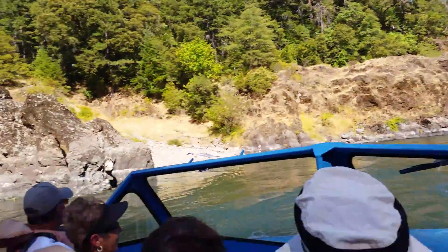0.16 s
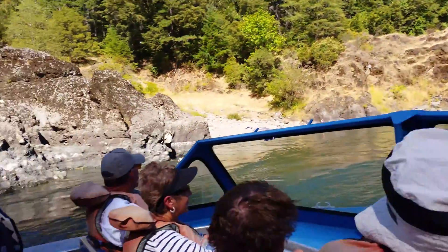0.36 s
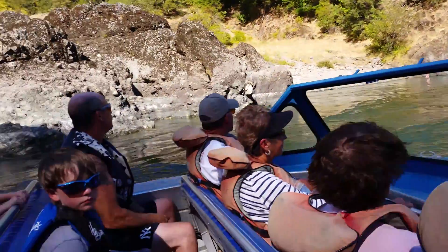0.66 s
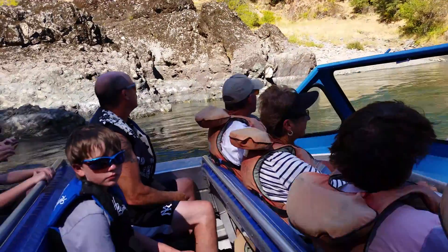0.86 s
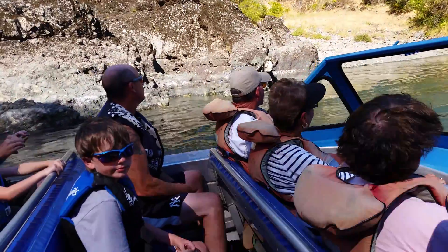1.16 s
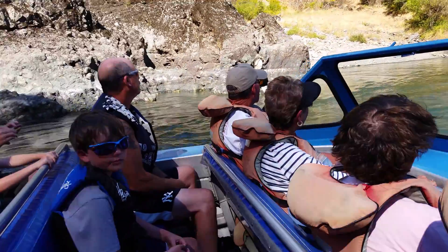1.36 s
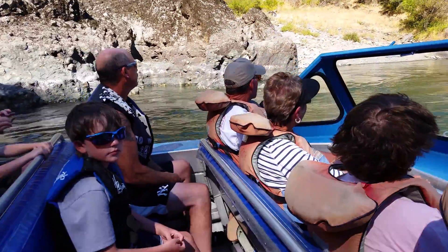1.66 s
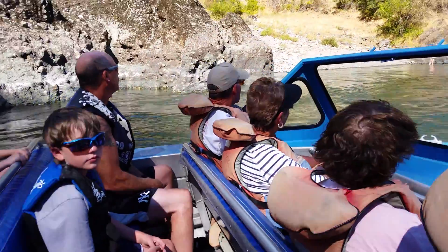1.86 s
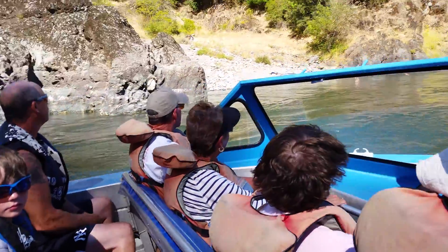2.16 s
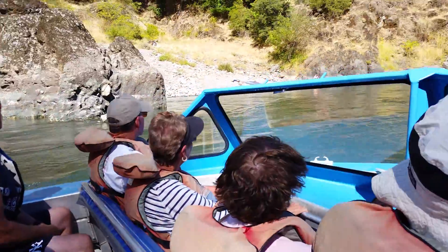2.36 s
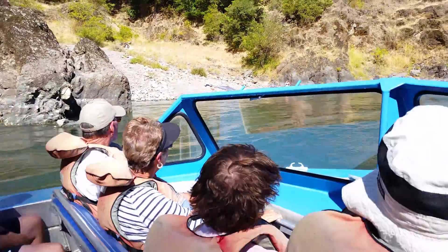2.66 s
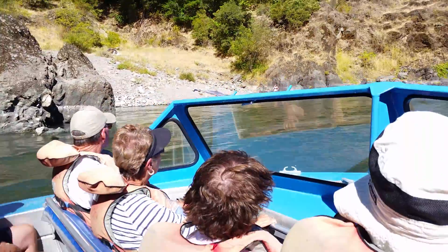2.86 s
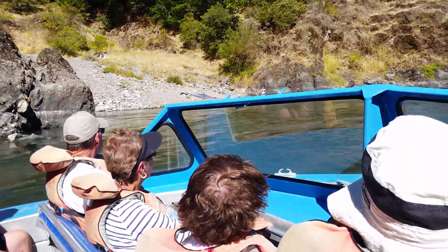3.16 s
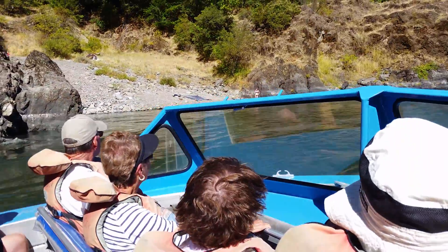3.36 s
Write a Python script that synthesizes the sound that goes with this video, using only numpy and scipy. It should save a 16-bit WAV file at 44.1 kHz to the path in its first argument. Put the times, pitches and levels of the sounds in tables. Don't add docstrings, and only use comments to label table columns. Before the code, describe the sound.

Several motorboat engines behind the passengers hum at slightly different speeds, pulsing together and rising slightly in pitch, while churning water rushes and spray hisses around; close, open-air stereo from a small camera aboard.

```python
import sys
import numpy as np
from scipy import signal
from scipy.fft import rfft, irfft
from scipy.io import wavfile
from scipy.ndimage import uniform_filter1d

SR = 44100
rng = np.random.default_rng(int(sys.argv[2]) if len(sys.argv) > 2 else 0)


def natural_amplitude(level_db):
    exponent = np.asarray(level_db, float) / 20
    return 10 ** exponent


def materialize(psi):
    bounded = np.clip(np.atleast_2d(psi).T, -1, 1)
    quanta = np.round(bounded * 32767).astype(np.int16)
    wavfile.write(sys.argv[1], SR, quanta)


N = 154350

# [t/s, jet wash level/dB, spray level/dB]
WASH_LEVELS = [(0.0, -44, -50.5), (0.12, -44.5, -54), (0.37, -44.5, -53), (0.69, -45, -56.5),
               (0.74, -44.5, -54), (1.64, -47, -53.5), (2.01, -48, -57), (2.37, -47.5, -56),
               (2.61, -48.5, -59.5), (3.45, -47.5, -60)]

WANDER_PER_S = 1.5


def in_time(rows):
    s, *columns = np.transpose(rows)
    return [np.interp(np.arange(N) / SR, s, c) for c in columns]


def at_hz(points, hz):
    p = np.array(points)
    return np.interp(np.log(hz + 1), np.log(p[:, 0]), p[:, 1])


def rms_one(x):
    return x / np.sqrt(np.mean(x ** 2) + 1e-20)


def colour(x, points):
    hz = np.fft.rfftfreq(len(x), 1 / SR)
    return irfft(rfft(x) * natural_amplitude(at_hz(points, hz)), len(x))


def drift(rate):
    r = np.exp(-200 * np.pi * rate / SR)
    slow = signal.lfilter([1], [1, -2 * r, r * r], rng.standard_normal(N // 100 + 1002))
    slow = slow[1000:]
    return np.interp(np.arange(N) / 100, np.arange(len(slow)), rms_one(slow - slow.mean()))


def openness_db():
    # [t/s, level/dB]
    flooding = [(0.0, -24.5), (0.02, -21), (0.24, -26.5), (0.42, -19), (0.5, -27.5), (0.91, -21),
                (1.04, -25.5), (1.07, -22), (1.47, -26), (1.5, -22.5), (2.49, -23.5), (2.88, -27.5),
                (3.18, -20.5), (3.5, -22)]
    db, = in_time(flooding)
    return db - db.mean()


def puffs(turns):
    # [f/Hz, width/Hz, level/dB]
    exhaust = [(86, 51.3, -3.5), (181, 64.7, -0.5), (211, 42.5, -1), (317, 86, -7.5), (406, 148, -14)]
    level_db, spread_db, jitter_s = -33.5, 5.0, .0012
    firings = np.flatnonzero(np.diff(np.floor(turns)))
    luck = rng.standard_normal((len(firings), 2))
    places = np.clip(firings + (jitter_s * SR * luck[:, 0]).astype(int), 0, N - 1)
    clicks = np.full(N, 1e-18)
    clicks[places] = natural_amplitude(spread_db * luck[:, 1]) - 1

    out = 0
    for k, (hz, width, db) in enumerate(exhaust):
        r = np.exp(-np.pi * width / SR)
        ringing = [1, -2 * r * np.cos(2 * np.pi * hz / SR), r * r]
        sign = (-1) ** k
        out = out + sign * natural_amplitude(db) * signal.lfilter([1 - r, 0, r - 1], ringing, clicks)
    return natural_amplitude(level_db) * rms_one(out)


def engine(rows, orders, start, firing_db, pan_db, lag):
    # [f/Hz, level/dB]
    hull = [(200, -1), (222, 1), (240, -5), (265, -2)]
    cylinders = 8
    firing_wander_db, wander_db, slip_turns = .5, 3.0, .04
    hz, db = in_time(rows)
    open_db = openness_db()
    turns = start + np.cumsum(hz) / SR
    firing_level = natural_amplitude(db + firing_db + firing_wander_db * drift(WANDER_PER_S))
    out = firing_level * np.cos(2 * np.pi * turns)

    for multiple, level_db in orders:
        share = multiple / cylinders
        phase = share * turns + rng.random() + slip_turns * drift(WANDER_PER_S)
        tone_db = level_db + at_hz(hull, share * hz) + wander_db * drift(WANDER_PER_S)
        if share > 1:
            tone_db = tone_db + open_db
        out += natural_amplitude(tone_db) * np.cos(2 * np.pi * phase)

    out = np.sqrt(2) * out + natural_amplitude(open_db) * puffs(turns)
    late = np.interp(np.arange(N) - lag * SR, np.arange(N), out)
    return np.array([out * natural_amplitude(pan_db / 2), late * natural_amplitude(-pan_db / 2)])


def three_engines():
    # [t/s, firing rate f/Hz, firing tone level/dB]
    speed_a = [(0.0, 125.6, -17), (0.292, 125.96, -17), (0.583, 126.76, -15), (0.875, 127.14, -18),
               (1.167, 129.64, -14), (1.458, 132.1, -13), (1.75, 133.99, -20), (2.042, 132.57, -20),
               (2.333, 133.0, -18), (2.625, 133.29, -13), (2.917, 133.41, -13), (3.208, 133.98, -19),
               (3.5, 134.08, -20)]
    speed_b = [(0.0, 121.34, -18), (0.292, 121.07, -21), (0.583, 120.79, -21), (0.875, 120.42, -22),
               (1.167, 122.67, -36), (1.458, 125.78, -20), (1.75, 127.85, -19), (2.042, 128.84, -17),
               (2.333, 130.02, -19), (2.625, 130.87, -21), (2.917, 131.97, -19), (3.208, 134.48, -21),
               (3.5, 136.15, -16)]
    speed_c = [(0.0, 113.44, -20), (0.292, 112.53, -26), (0.583, 111.76, -21), (0.875, 111.54, -18),
               (1.167, 112.19, -19), (1.458, 113.34, -23), (1.75, 112.41, -18), (2.042, 112.88, -19),
               (2.333, 113.71, -20), (2.625, 115.11, -17), (2.917, 117.33, -17), (3.208, 119.19, -21),
               (3.5, 123.1, -20)]
    # [multiple of the full eight-firing cycle, level/dB rms]
    tones_a = [(3, -34), (4, -37), (5, -33), (6, -37.5), (9, -36), (10, -32.5), (11, -33.5), (12, -36.5),
               (13, -35.5), (14, -36), (16, -36.5), (18, -39.5), (20, -46.5)]
    tones_b = [(3, -34), (5, -24.5), (6, -37.5), (7, -37.5), (10, -34), (11, -30), (12, -43.5), (13, -30.5),
               (14, -37), (16, -40), (20, -42)]
    tones_c = [(4, -39.5), (6, -39), (7, -32), (10, -33.5), (11, -38), (12, -39.5), (14, -40.5),
               (16, -29.5), (18, -38)]
    a = engine(speed_a, tones_a, start=.24, firing_db=1.5, pan_db=-1.5, lag=.00027)
    b = engine(speed_b, tones_b, start=.79, firing_db=-0.4, pan_db=0.5, lag=.00042)
    c = engine(speed_c, tones_c, start=.62, firing_db=1.1, pan_db=-3.5, lag=.0003)
    return a + b + c


def water(spectrum, patchy_db, shared_db, rate):
    # [f/Hz, likeness from -1 to 1]
    likeness = [(170, 0.8), (430, 0.64), (690, .42), (950, -0.021), (1350, -0.43), (2200, 0), (3100, 0.024),
                (3900, -.12), (4600, 0)]
    hz = np.fft.rfftfreq(N, 1 / SR)
    together = drift(rate)
    mid, side = rfft(rng.standard_normal((2, N)))
    alike = np.clip(at_hz(likeness, hz), -1, 1)
    stereo = np.sqrt(1 + alike) * mid + np.sqrt(1 - alike) * side * [[1], [-1]]
    both = natural_amplitude(at_hz(spectrum, hz)) * stereo
    place = 2 * np.log2(hz + 1)
    faintest_db = min(spectrum[0][1], spectrum[-1][1], -15)
    out = 0
    for k in range(8, 30):
        if at_hz(spectrum, 2 ** (k / 2)) > faintest_db:
            band = irfft(both * np.clip(1 - abs(place - k), 0, 1), N)
            out = out + natural_amplitude(patchy_db * drift(rate) + shared_db * together) * band
    return rms_one(out)


def jet_wash():
    # [f/Hz, level/dB per Hz]
    rush_spectrum = [(200, 0.5), (600, 8.5), (1000, 3.5), (1500, 0.5), (2500, -4), (3300, -10),
                     (4500, -19.5), (7000, -30.5)]
    wash_db, _ = in_time(WASH_LEVELS)
    return natural_amplitude(wash_db + 9) * water(rush_spectrum, patchy_db=0.5, shared_db=1.1, rate=13.0)


def spray():
    # [f/Hz, level/dB per Hz]
    hiss_spectrum = [(3000, -21.5), (5000, -6), (8000, -2), (15000, 1)]
    _, spray_db = in_time(WASH_LEVELS)
    return natural_amplitude(spray_db + 9) * water(hiss_spectrum, patchy_db=1.4, shared_db=-0.2, rate=20.5)


def drops():
    # [t/s, level/dB]
    hits = [
        (.372, -38),
        (.83, -42),
        (1.312, -42),
        (1.58, -43),
        (1.993, -45),
        (2.36, -45),
    ]
    t60_s = .06
    t, gain = np.arange(N) / SR, np.zeros(N)
    for s, db in hits:
        gain += natural_amplitude(db - 60 * np.clip(t - s, 0, 1) / t60_s) * (t >= s)
    bright = signal.butter(2, 3000, "high", fs=SR, output="sos")
    return gain * signal.sosfilt(bright, rng.standard_normal((2, N)))


def hull_rumble():
    # [f/Hz, level/dB per Hz]
    rumble_spectrum = [(25, -23.5), (50, -9), (100, -3.5), (200, -5.5), (300, -11), (500, -17), (800, -25),
                       (1300, -47)]
    level = natural_amplitude(-29 + 0.51 * openness_db())
    left_right = natural_amplitude([[-.8], [.8]])
    return level * water(rumble_spectrum, patchy_db=1.5, shared_db=1.24, rate=8.0) * left_right


def scene():
    return three_engines() + jet_wash() + spray() + drops() + hull_rumble()


def microphone_ports(x):
    # [f/Hz, level/dB]
    left_port = [(4500, -0.5), (5500, -6), (6500, -13), (7600, -9.5), (8600, -1.5), (9800, 6), (11500, 1),
                 (14500, -6)]
    right_port = [(4500, 0), (5800, -6), (7000, -11.5), (8500, -16), (9800, -11.5), (11000, -5.5),
                  (12500, -2.5), (14300, -2)]
    return np.array([colour(x[0], left_port), colour(x[1], right_port)])


def gate(x, frame):
    from_hz, cutoff_hz, band_bins = 4000, 14620, 16
    gate_db, doubt_db = -98.6, 2.3
    follows, thin_db = .5, -2.0
    hz, _, z = signal.stft(x, SR, "cosine", frame, scaling="psd")
    hz, power = hz[:-1, None], 2 * abs(z[:, :-1]) ** 2 + 1e-30
    treble_db = 10 * np.log10(np.mean(power * (hz > from_hz), axis=(0, 1)))
    treble_db = uniform_filter1d(treble_db, size=9)
    edge_db = gate_db + follows * (treble_db - np.median(treble_db))

    bands = power.reshape(2, -1, band_bins, z.shape[-1]).mean(axis=2)
    band_kept = 10 * np.log10(bands) > edge_db + doubt_db * rng.standard_normal(bands.shape)
    bin_kept = 10 * np.log10(power) > edge_db + thin_db
    kept = np.repeat(band_kept, band_bins, axis=1) & bin_kept | (hz < from_hz)
    z[:, :-1] *= kept & (hz < cutoff_hz)
    return signal.istft(z, SR, "cosine", frame, scaling="psd")[1]


def top_cut(x):
    return signal.sosfilt(signal.butter(12, 15590, fs=SR, output="sos"), x)


def record(dry):
    frame, top, fade_in_s = 2048, 1.2, .004
    lead = 1019 + frame
    wide = np.pad(dry, ((0, 0), (lead, lead)), "reflect", reflect_type="odd")
    rounded = top * np.tanh(microphone_ports(wide) / top)
    heard = gate(rounded, frame)[:, lead:lead + N]
    fade_in = np.minimum(np.arange(N) / (fade_in_s * SR), 1)
    return top_cut(heard * fade_in)


dry = scene()
out = record(dry)
materialize(out)
```